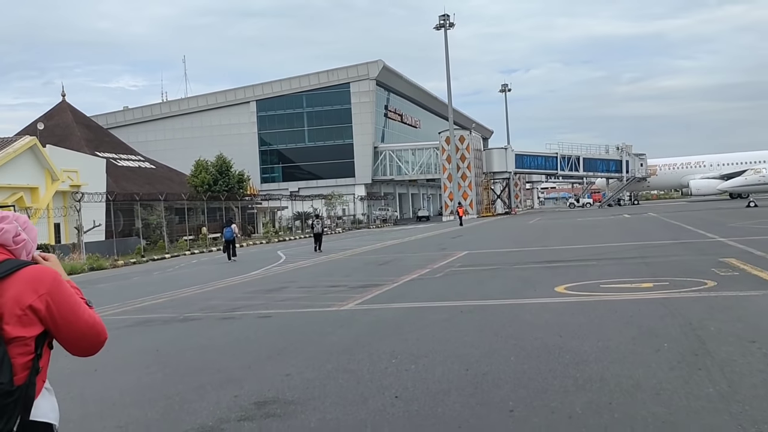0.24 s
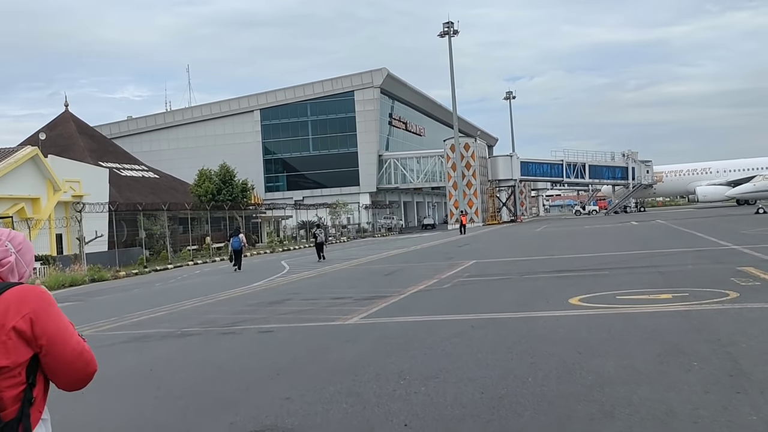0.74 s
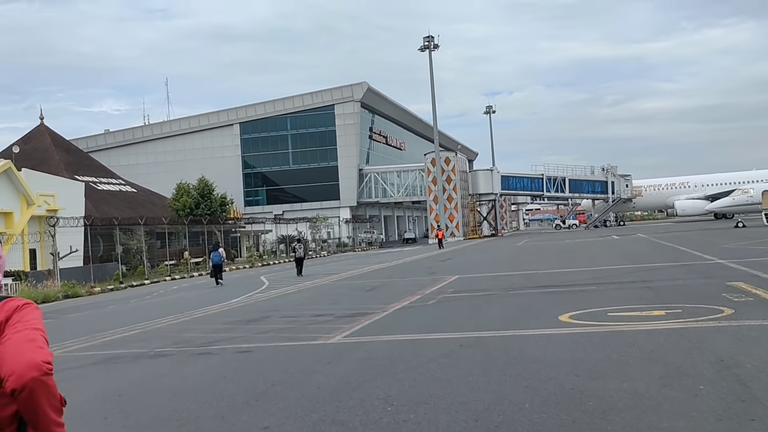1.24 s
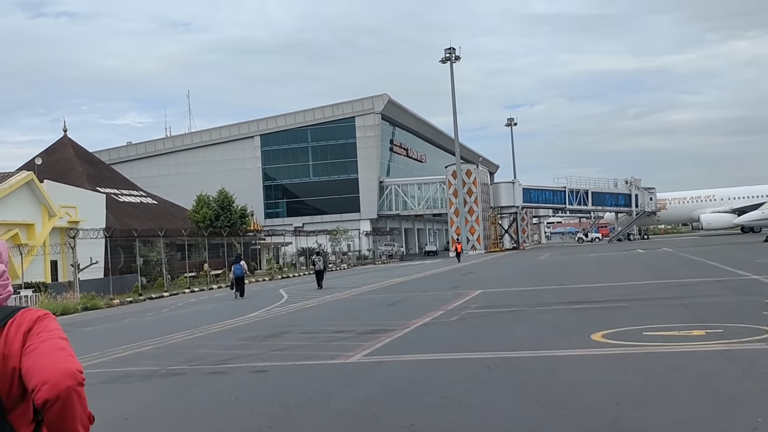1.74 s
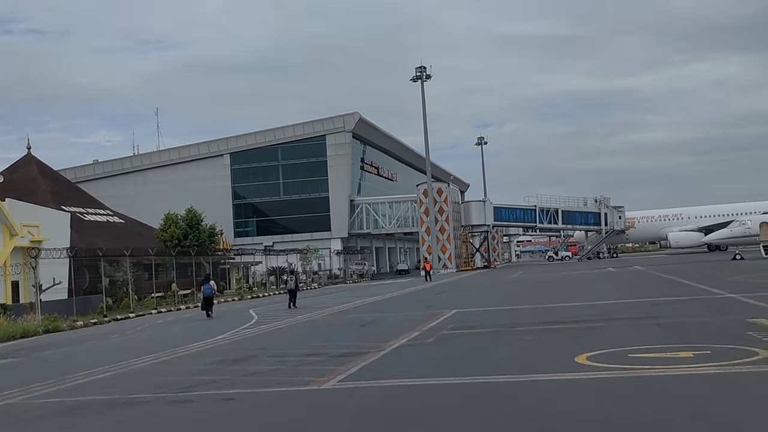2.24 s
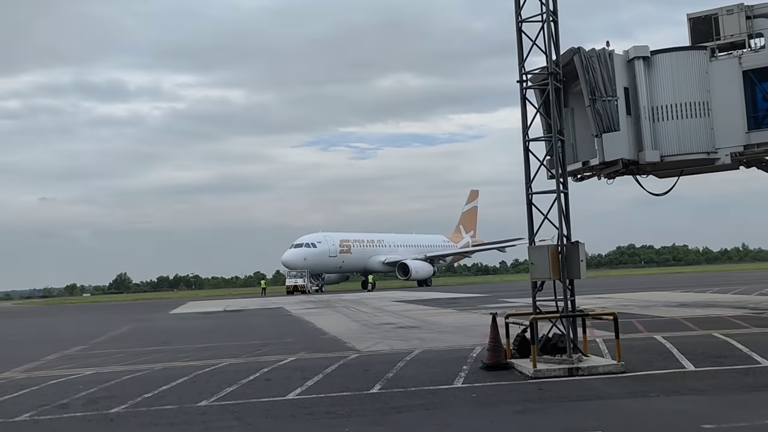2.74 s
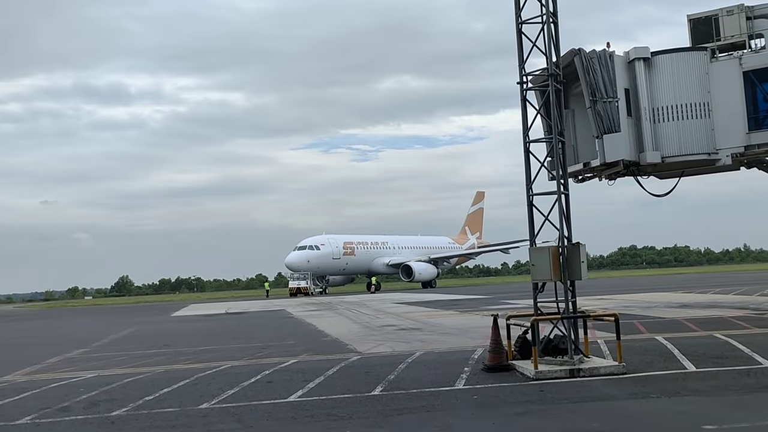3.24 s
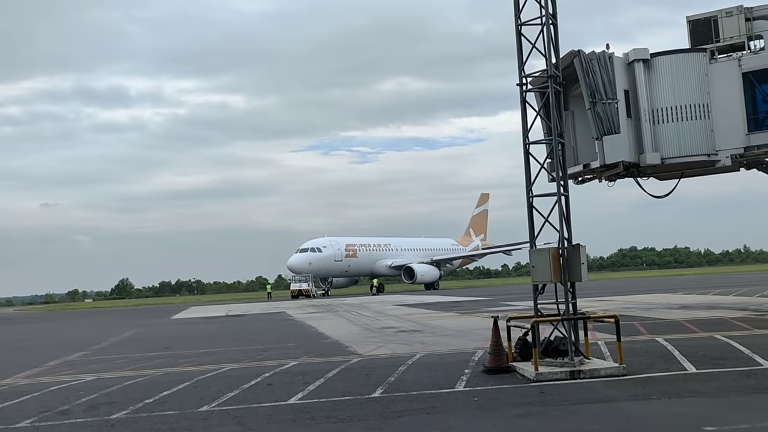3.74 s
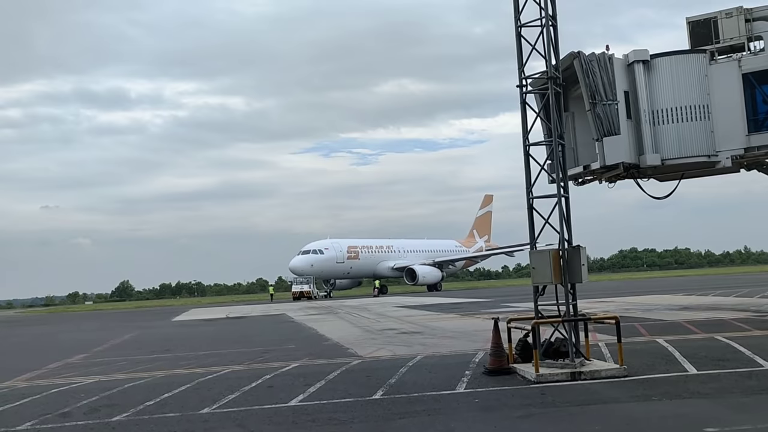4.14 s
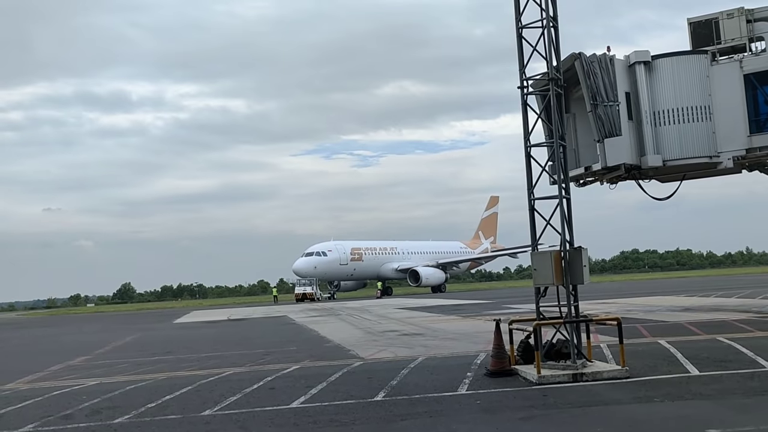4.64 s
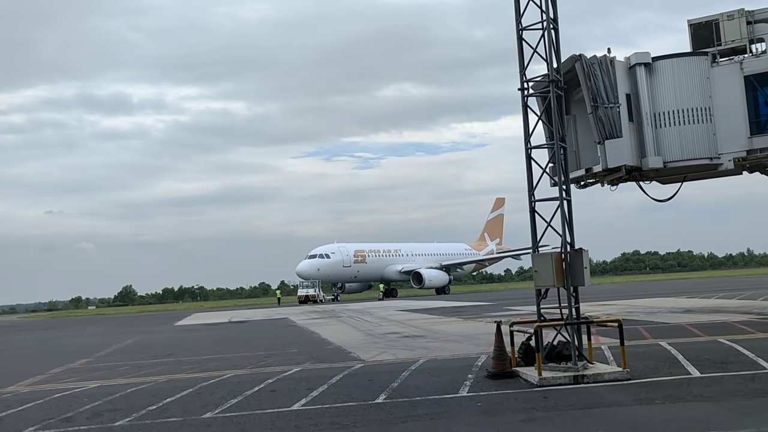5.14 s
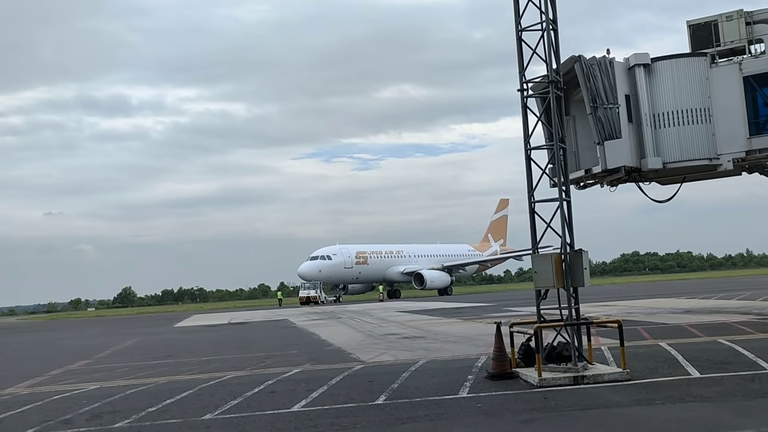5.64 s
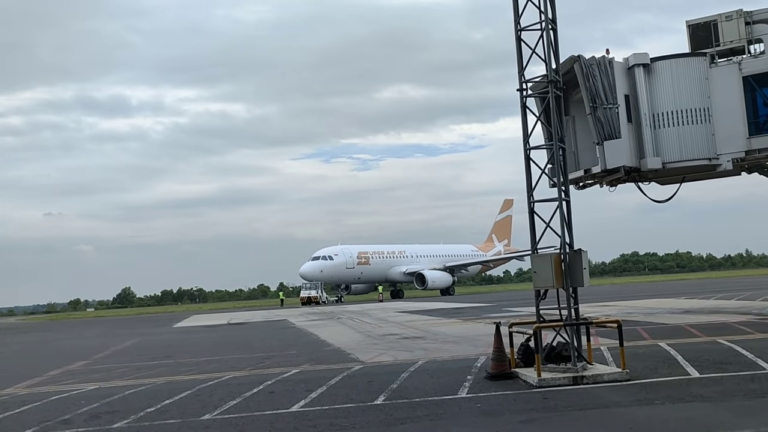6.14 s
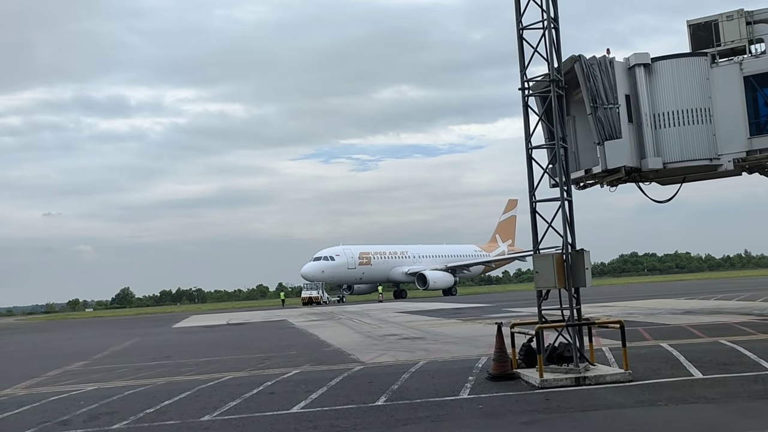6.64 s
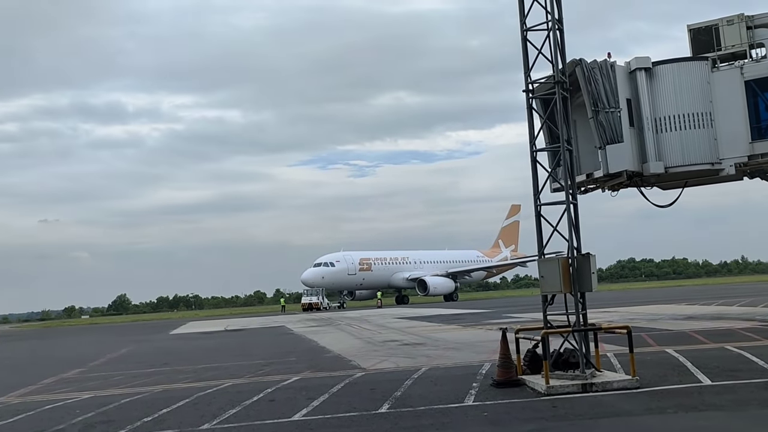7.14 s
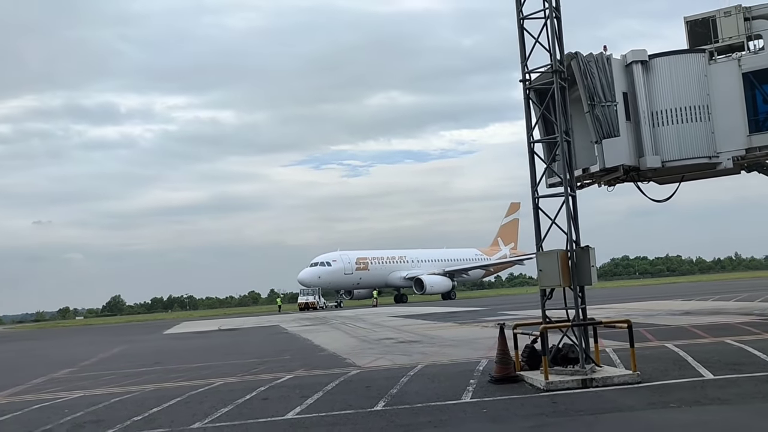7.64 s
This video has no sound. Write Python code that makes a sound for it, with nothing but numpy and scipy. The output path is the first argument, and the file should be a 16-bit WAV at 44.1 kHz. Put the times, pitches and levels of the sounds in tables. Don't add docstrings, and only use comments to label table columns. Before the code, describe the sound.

On an open airport apron, idling jet engines give a steady low roar, airy rush and fine hiss with a faint wavering whine. Wind flutters and pops against the stereo microphone. Around 2.5 seconds everything fades to silence, then returns from a sheltered spot: less wind, stronger fluctuating turbine whine, a low hum, and another engine slowly rising in pitch.

```python
import sys
import numpy as np
from scipy import signal
from scipy.fft import rfft, irfft
from scipy.io import wavfile
from scipy.ndimage import uniform_filter1d

SR = 44100
rng = np.random.default_rng(int(sys.argv[2]) if len(sys.argv) > 2 else 0)


def natural_amplitude(level_db):
    exponent = np.asarray(level_db, float) / 20
    return 10 ** exponent


def wrap_up_sound(samples):
    columns = np.atleast_2d(samples).T
    tamed = np.clip(columns, -1, 1)
    steps = np.round(tamed * 32767).astype(np.int16)
    wavfile.write(sys.argv[1], SR, steps)


N = 348390
T = np.arange(N) / SR
CUT_S = 2.4955
# f/Hz, density/dB
THUMP_SPECTRUM = [(10, -19), (22, 0), (35, 1), (55, -4), (90, -6), (200, -62)]


def evened(x):
    return x / np.sqrt(np.mean(abs(x) ** 2) + 1e-20)


def read(points, hz):
    f, value = np.transpose(points)
    return np.interp(np.log(hz + 1), np.log(f + 1), value)


def column(rows, index, t):
    rows = np.array(rows)
    return np.interp(t, rows[:, 0], rows[:, index])


def smoothed(x, first_size, second_size):
    return uniform_filter1d(uniform_filter1d(x, size=first_size, axis=-2), size=second_size, axis=-1)


def drift(width_hz, count, size):
    step = 64
    z = rng.standard_normal((count, size // step + 2, 2)) @ [1, 1j]
    hz = np.fft.fftfreq(z.shape[1], step / SR)
    z = np.fft.ifft(np.fft.fft(z) / (1 + (2 * hz / width_hz) ** 2))
    at = np.arange(size) / step
    return [evened(np.interp(at, np.arange(len(v)), v)) for v in z]


def swells(t, rows, rest_db):
    return natural_amplitude(rest_db) + sum(natural_amplitude(db) * np.exp(-((t - at) / half) ** 2) for at, db, half in rows)


def coloured(spectrum, size):
    gain = natural_amplitude(read(spectrum, np.fft.rfftfreq(size, 1 / SR)))
    return evened(irfft(rfft(rng.standard_normal((2, size))) * gain, size))


def two_paths(db, phase_turns, front, across):
    carrier = np.exp(2j * np.pi * phase_turns)
    return np.sqrt(2) * natural_amplitude(db) * (carrier * [front - across, front + across]).real


def carried_tone(t, turns, rows, rest_db, ports_db, scatter):
    paths = 1 + scatter * np.array(drift(2.5, 2, len(t)))
    level = np.sqrt(2 / (1 + scatter ** 2)) * natural_amplitude(ports_db)[:, None] * swells(t, rows, rest_db)
    return level * (paths * np.exp(2j * np.pi * turns)).real


def airflow(t, spot, spectrum, layer, size, patchy_db, flicker_db, trim_db):
    # f/Hz, correlation
    likeness = [
        [(60, 1), (400, 0.95), (900, 0.78), (1100, 0.52), (1300, 0.032), (1600, 0.68), (2500, 0), (15000, 0.37)],
        [(60, 1), (270, 0.98), (450, 0.78), (550, 0.62), (750, 0.85), (1000, 0.012), (1300, 0), (15000, 0.098)],
    ]
    # f/Hz, difference/dB
    lean = [
        [(60, -6), (110, -9), (200, 1), (380, 0), (700, 1.0), (1290, -0.5), (2380, -1), (4400, 0.5), (8120, 7.5), (15000, 10)],
        [(60, 0.5), (110, -1), (200, 1.5), (380, 1), (700, -2.5), (1290, -1.5), (2380, -6.5), (4400, -3), (8120, 1.5), (15000, 18)],
    ]
    left_engine = [
        (.35, 14),
        (.3, 12),
    ]
    # roar/dB, rush/dB, sizzle/dB
    steady_db = [
        (-25.5, -29.5, -45),
        (-28, -26, -41.5),
    ]
    # t/s, sizzle gain/dB
    facing = [(0, 1), (.9, 2.5), (1.6, 5.5), (2.0, 5), (2.49, 3.5), (2.6, 2.5), (3.1, 3), (3.6, -0.5),
              (4.4, -0.5), (5.2, 2), (6.5, 1.7), (7.4, 3.5), (7.9, 1.3)]
    # roar, rush, sizzle [dB/dB]
    follow = [
        (0.21, -0.46, 1),
        (0.13, 0.27, 0.98),
    ]

    overlap = size * 3 // 4
    hz, s, z = signal.stft(rng.standard_normal((2, len(t))), SR, nperseg=size, noverlap=overlap)
    patches = evened(smoothed(rng.standard_normal(z.shape), 8, 20))
    flicker = evened(uniform_filter1d(rng.standard_normal(len(s)), size=12))

    share, lag = left_engine[spot]
    aside = share * np.exp(-2j * np.pi * hz * lag / SR)
    aside = aside / (1 + (1200 / (hz + 1)) ** 4 + (hz / 9000) ** 4)
    same = (np.clip(read(likeness[spot], hz), 0, .99) + aside)[:, None]
    other = np.sqrt(np.maximum(1 - abs(same) ** 2, 0))
    pair = np.array([z[0], same * z[0] + other * z[1]]) / np.sqrt((1 + same.real) / 2)

    lively = 1 / (1 + (hz[:, None] / 10500) ** 8)
    lean_db = read(lean[spot], hz)[:, None] / 2
    effort_db = steady_db[spot][layer] + follow[spot][layer] * column(facing, 1, s + t[0])
    swell_db = effort_db - effort_db.mean() + flicker_db * flicker + patchy_db * patches
    level_db = trim_db + effort_db.mean() + lively * swell_db
    tint = evened(natural_amplitude(read(spectrum[spot], hz)))[:, None]
    pair *= tint * natural_amplitude(level_db + np.array([lean_db, -lean_db]))
    return signal.istft(pair, SR, nperseg=size, noverlap=overlap)[1][:, :len(t)]


def whine(t, spot, wander_hz, fading_hz):
    # level/dB, sideways share/dB, lean to the right (-1..1)
    stack = [
        [(0, -12, 0), (0, -8, -.2), (0, -8, .1), (-2, -5, .1), (-2, 0, .3), (-3, 0, .1), (-65, 0, .1)],
        [(0, -9, 0), (0, -3, -.15), (-1.5, 1, .4), (0, -3, .5), (0, -3, .5), (-2, -3, .2), (-58, 0, .2)],
    ]
    # t/s, peak/dB, half length/s
    first = [(0.3, -36, 0.41), (0.84, -41, 0.17), (2.55, -38.5, 0.6), (3.18, -35, 0.12), (3.55, -31.5, 0.1),
             (3.9, -34.5, 0.12), (4.42, -34.5, 0.34), (4.95, -37, 0.08), (5.21, -33.5, 0.12),
             (5.51, -31.5, 0.1), (5.75, -35, 0.11), (6.05, -33, 0.13), (6.37, -28.5, 0.13),
             (6.74, -33.5, 0.18), (7.21, -30.5, 0.21), (7.63, -31, 0.15)]
    second = [(.46, -38.5, 0.33), (.73, -40.5, 0.12), (1.41, -42, 0.089), (1.64, -36, 0.54),
              (2.77, -35.5, 0.038), (2.95, -34.5, 0.42), (3.85, -31.5, 0.43), (4.45, -32.5, 0.18),
              (4.95, -33, 0.19), (5.27, -32, 0.056), (5.62, -34, 0.3), (6.38, -32, 0.23),
              (6.98, -39.5, 0.23), (7.42, -35.5, 0.11), (7.62, -37, 0.093), (7.85, -32, .12)]
    third = [(.2, -48, .07), (.57, -46, 0.073), (2.26, -50, 0.057), (1.02, -41, 0.18), (1.76, -46, 0.28),
             (2.9, -43, 0.23), (3.5, -45.5, 0.33), (4.95, -44, 0.57), (6.34, -43, 0.55), (7.1, -56, .2),
             (7.7, -43.5, 0.5)]
    fourth = [(.14, -48, 0.1), (.52, -48, 0.088), (.84, -44, 0.09), (1.3, -42, 0.062), (1.62, -44, .07),
              (2.05, -58, .15), (3.05, -40, .12), (3.35, -39.5, 0.16), (3.57, -30, 0.12), (4.04, -37, 0.18),
              (4.42, -38.5, 0.054), (4.8, -38.5, 0.22), (5.49, -37.5, 0.26), (5.83, -35, .13),
              (6.33, -37.5, 0.24), (6.78, -38.5, .1), (7.15, -35.5, 0.24), (7.63, -36, 0.28)]
    fifth = [(2.8, -43, 0.092), (3.55, -45, .15), (3.95, -44, .16), (4.2, -42.5, 0.06), (4.57, -44, .1),
             (4.95, -42, .12), (5.27, -46, 0.092), (5.8, -46, .14), (6.2, -45, .1), (6.5, -45, .12),
             (6.87, -42, 0.065), (7.27, -44, .1), (7.85, -44, .12)]
    sixth = [(3.0, -46.5, 0.13), (3.42, -46, .08), (3.7, -46, .1), (4.2, -43.5, 0.13), (4.42, -46, .07),
             (4.67, -45, .08), (4.95, -43, .06), (5.4, -42, .09), (5.85, -48, .1), (6.42, -53, .12),
             (6.8, -48, .1), (7.3, -49, .1)]
    swelling = first, second, third, fourth, fifth, sixth
    shaft_hz = (645.6, 643.0)[spot]
    faint_db, per_overtone_db = (-53.5, -50)[spot], -0.5

    turns = np.cumsum(shaft_hz + wander_hz * drift(0.61, 1, len(t))[0].real) / SR
    out = np.zeros((2, len(t)))
    for k, (db, side_db, lean) in enumerate(stack[spot], 1):
        front, side = drift(fading_hz * k ** 0.53, 2, len(t))
        if k <= len(swelling):
            swell = swells(t, swelling[k - 1], faint_db + per_overtone_db * k)
            flutter = 1 + 0.13 * drift(14.0, 1, len(t))[0]
            front = swell * np.exp(.4j * front.real) * flutter
            side = side * np.sqrt(np.mean(abs(front) ** 2))
        else:
            front = .75 + .6 * front
        across = lean * front + natural_amplitude(side_db) * side
        out += two_paths(db, k * turns, front, across)
    return out


def blades(t, spot):
    # f/Hz, width/Hz, level/dB
    tones = [
        [(3647, 14, -62), (5125, 12, -63), (6944, 10, -72), (7687, 14, -78), (8714, 14, -80), (9064, 16, -78)],
        [(133, 9, -48), (165, 12, -43), (197, 10, -40), (236, 9, -39), (264, 8, -41), (425, 14, -45), (3848, 25, -52), (6916, 30, -66), (9021, 14, -65)],
    ]
    # f/Hz, width/Hz, level/dB
    twin = [
        (1280.4, 2.5, -48),
        (1920.6, 4, -52),
        (2560.8, 4, -50),
    ]
    out = np.zeros((2, len(t)))
    for hz, width_hz, db in tones[spot] + twin * spot:
        front, side = drift(width_hz, 2, len(t))
        out += two_paths(db, hz * t, front, side * hz / (hz + 1500))
    return out


def standpoint(t, spot):
    # f/Hz, density/dB
    roar_spectrum = [
        [(12, -44), (20, -21), (32, -14), (53, -6.5), (123, -17), (166, -3.5), (197, -0.5), (226, -0.5), (273, -2.5), (304, -12), (348, -6), (398, -9.5), (500, -20.5), (650, -53), (1100, -120)],
        [(12, -66), (20, -38), (32, -19), (60, -10.5), (76, -14), (97, -19), (118, -10), (187, 0), (248, -0.5), (300, -5.5), (420, -6.5), (455, -17), (500, -8), (650, -32.5), (1100, -120)],
    ]
    rush_spectrum = [
        [(250, -58), (420, -8), (515, -9), (651, -7), (685, -4), (1020, -4.5), (1140, -11.5), (1330, -12.5), (1370, -11), (1520, -19), (2000, -11.5), (2280, -13.5), (4800, -23.5), (6240, -43), (10600, -120)],
        [(250, -44), (420, -9.5), (600, -5.5), (644, -2.5), (685, -6), (1020, -8), (1250, -9), (1470, -14.5), (2380, -11.5), (2580, -11), (2830, -13.5), (3720, -12.5), (4800, -23.5), (6240, -29.5), (10600, -120)],
    ]
    sizzle_spectrum = [
        [(2530, -6), (4300, 0), (4890, -5.5), (5270, -0.5), (6120, -10.5), (6820, -11), (7310, -17.5), (7800, -17), (8270, -32), (9060, -17.5), (9820, -30), (10600, -30), (11900, -41), (13800, -35), (15500, -46)],
        [(2530, -29), (4300, -7), (6160, -9), (6600, -12), (7120, -14), (7270, -16.5), (8140, -21), (8770, -18.5), (9200, -15.5), (9350, -18), (10000, -26), (11400, -34), (12000, -48), (13900, -48.5), (15500, -66)],
    ]
    roar = airflow(t, spot, roar_spectrum, layer=0, size=4096,
                   patchy_db=1.4, flicker_db=1.43, trim_db=[-3.5, -1.6][spot])
    rush = airflow(t, spot, rush_spectrum, layer=1, size=512,
                   patchy_db=0.84, flicker_db=0.26, trim_db=[-1.8, -1.7][spot])
    sizzle = airflow(t, spot, sizzle_spectrum, layer=2, size=512,
                     patchy_db=-0.4, flicker_db=-0.83, trim_db=[-.2, -.3][spot])
    tones = whine(t, spot, wander_hz=0.394, fading_hz=3.3) + blades(t, spot)
    return roar + rush + sizzle + tones


def hum(waver_hz, waver_db):
    # t/s, f/Hz, level/dB
    course = [(0, 63, -40), (1.6, 63, -39), (2.4, 63.13, -39.5), (2.6, 65.9, -40), (3.0, 65.94, -42),
              (3.2, 66.04, -45), (7.9, 66, -47)]
    pitch, swell = np.real(drift(5.2, 2, N))
    turns = np.cumsum(column(course, 1, T) + waver_hz * pitch) / SR
    level = natural_amplitude(column(course, 2, T) + waver_db * swell)
    return np.sqrt(2) * level * np.cos(2 * np.pi * turns)


def wind(t, lumpy_db, thump_db, flutter_db):
    # t/s, half length/s, thump/dB, flutter/dB
    gusts = [
        [(.38, .08, -39, -33), (.78, 0.079, -42, -35), (.98, .04, -36, -31), (1.1, .05, -28, -27), (1.24, 0.064, -31, -32), (1.68, 0.072, -37, -24), (1.79, 0.078, -25, -40), (1.9, 0.097, -33, -28)],
        [(.2, .15, -43, -26.5), (.65, 0.1, -28, -21), (.9, 0.19, -45, -25), (1.35, 0.078, -39, -27), (1.55, .07, -29, -37), (1.74, 0.066, -32, -27), (1.85, 0.045, -32, -41), (2.15, 0.066, -41, -27)],
    ]
    # t/s, port, peak/dB, f/Hz, spread/s
    pops = [(.645, 1, -19, 45, .025), (.98, 0, -27, 30, .02), (1.11, 0, -22, 40, .02),
            (1.79, 0, -22, 28, .03), (1.365, 1, -13, 170, 0.004), (1.378, 0, -14, 33, 0.022),
            (1.617, 0, -14, 171, 0.0072), (1.617, 1, -21, 190, 0.0055), (1.693, 0, -11, 236, 0.0076),
            (1.75, 0, -17, 284, 0.0055), (1.777, 1, -14, 130, 0.0074), (1.867, 0, -3, 208, 0.0032),
            (1.872, 0, -11, 38, 0.01), (1.987, 0, -9.5, 169, 0.0026)]
    # f/Hz, density/dB
    flutter_spectrum = [(50, -12), (100, 1), (170, 2.5), (250, -5.5), (350, -9.5), (500, -20), (1000, -66)]
    breeze_thump_db, breeze_flutter_db = -50, -38.5

    thump = np.array([swells(t, [(s, db, half) for s, half, db, _ in port], breeze_thump_db)
                      for port in gusts])
    flutter = np.array([swells(t, [(s, db, half) for s, half, _, db in port], breeze_flutter_db)
                        for port in gusts])
    lumps = natural_amplitude(lumpy_db * np.real(drift(25., 2, len(t))))
    out = natural_amplitude(thump_db) * thump * coloured(THUMP_SPECTRUM, len(t))
    out += natural_amplitude(flutter_db) * flutter * lumps * coloured(flutter_spectrum, len(t))
    for at, port, db, pop_hz, spread_s in pops:
        u = t - at
        skewed_s = spread_s * (0.86 + 0.27 * np.tanh(u / .002))
        envelope = np.exp((.001 - np.hypot(u, .001)) / skewed_s)
        out[round(port)] += natural_amplitude(db) * np.cos(2 * np.pi * pop_hz * u) * envelope
    return out


def slower_engine(t):
    # t/s, peak/dB, half length/s
    carry = [(.14, -42, .13), (.78, -48.5, .06), (.97, -49, 0.13), (1.45, -45, 0.072), (2.2, -48, 0.26)]
    return carried_tone(t, 2561 * t, carry, -60.5, np.zeros(2), scatter=0.45)


def spooling(t):
    # t/s, shaft speed/Hz
    speed = [(2.5, 112.27), (2.9, 112.55), (3.5, 112.95), (4.7, 113.27), (5.7, 113.68), (6.1, 114.32),
             (6.6, 115.14), (7, 116.05), (7.4, 116.73), (7.9, 117.45)]
    # t/s, peak/dB, half length/s
    order_swells = [
        [(3.5, -48, .25), (5.0, -52, 0.2), (7.5, -43, .1)],
        [(3.05, -42, .15), (3.55, -41, 0.33), (4.1, -48, .15), (4.8, -46, .22), (5.7, -44, 0.13), (6.15, -42.5, .16), (6.6, -41, 0.14), (6.9, -39, .15), (7.5, -39, .3)],
        [(3.9, -42, .15), (4.82, -38, .25), (6.28, -40, .1), (6.65, -37.5, 0.17), (7.0, -37.5, .1), (7.28, -35, 0.081), (7.7, -40, .25)],
        [(3.0, -51, 0.18), (4.8, -54, 0.086), (5.15, -50, 0.18), (6.2, -58, .3)],
        [(3.5, -41, .2), (3.95, -47, 0.14)],
        [(3.3, -59, .15), (3.8, -61, .1), (5.25, -57, .35), (5.85, -61, .1), (6.7, -61, .2)],
        [(3.8, -64, .2), (6.3, -63, .2), (7.0, -61, .2)],
    ]
    # t/s, peak/dB, half length/s
    pure_swells = [
        [(3.08, -43, .08), (3.6, -49, .2), (4.2, -48, .15), (5.1, -47, .15), (5.65, -51, .1), (6.9, -54, .2)],
        [(2.75, -45, 0.11), (3.3, -45, 0.14), (4.2, -47, 0.27), (5.05, -47, 0.27), (5.65, -47, 0.2), (6.1, -53, .15), (7.7, -51, .15)],
        [(4.0, -53, .15), (5.6, -51, .15), (6.7, -46, 0.23), (7.35, -45, .06)],
        [(3.3, -64, 0.33), (4.3, -66, 0.48), (5.7, -66, 0.58), (7.3, -65, .4)],
    ]
    orders, orders_faint_db = (21, 22, 23, 42.57, 11, 53.8, 54.8), (-55, -55, -55, -60, -56, -68, -70)
    pure_hz, pure_faint_db = (3603, 3638, 3888, 6916), (-56, -55, -56, -65)
    ports_db = np.array((-5, 2))

    turns = np.cumsum(column(speed, 1, t) + 0.0509 * drift(1.48, 1, len(t))[0].real) / SR
    rising = sum(carried_tone(t, k * turns, rows, db, ports_db, scatter=0.53)
                 for k, rows, db in zip(orders, order_swells, orders_faint_db))
    steady = sum(carried_tone(t, hz * t, rows, db, ports_db / 2, scatter=0.49)
                 for hz, rows, db in zip(pure_hz, pure_swells, pure_faint_db))
    return rising + steady


def late_gust(t):
    # t/s, thump/dB
    course = [
        (2.5, -50),
        (2.9, -39),
        (3.05, -53),
        (3.25, -62),
    ]
    return natural_amplitude(column(course, 1, t)) * coloured(THUMP_SPECTRUM, len(t))[0]


def scene():
    first, second = T[T < CUT_S], T[T >= CUT_S]
    windy = standpoint(first, 0) + wind(first, lumpy_db=0.5, thump_db=-4.5, flutter_db=-5.5)
    windy += slower_engine(first)
    sheltered = standpoint(second, 1) + spooling(second) + late_gust(second)
    return np.concatenate([windy, sheltered], axis=1) + hum(waver_hz=1.07, waver_db=1.0)


def gate(x, start_s, limits, budget_db, band_db):
    # t/s, strength/dB, half length/s
    spare = [(3.08, 5, .025), (3.19, 0, .04), (3.3, 5, .03), (3.624, 0.5, 0.11), (4.272, 0, .04),
             (4.48, 1, .03), (4.584, 5, .03), (4.83, 5, .03), (4.93, 0, .03), (5.18, 3, .09),
             (5.36, 2, .06), (5.823, 8, 0.022), (6.55, 4, .03), (6.63, 3, .02), (6.97, 2, .03),
             (7.142, 3.5, 0.096), (7.33, 4, 0.044), (7.68, 1, .03)]
    size = x.shape[1]
    x = np.pad(x, ((0, 0), (0, 2048)), "reflect")
    hz, s, z = signal.stft([x[0] + x[1], x[0] - x[1]], SR, nperseg=2048, noverlap=1536,
                           boundary="even", padded=False)
    power = abs(z) ** 2 + 1e-20
    patch = smoothed(power, 3, 3)
    usual = smoothed(power, 30, 40)
    chance = rng.standard_normal((2, len(s)))
    budget = evened(uniform_filter1d(chance[0], size=2)) * .6 + swells(s + start_s, spare, -29)
    bands = evened(smoothed(rng.standard_normal(z.shape[1:]), 12, 4))
    top = np.exp(-((hz[:, None] - 11000) / 1700) ** 4)
    limit_db = read(limits, hz)[:, None] + band_db * bands * (1 - 0.45 * top)
    limit_db = limit_db - budget_db * budget * top
    kept = (10 * np.log10(abs(patch / usual)) > limit_db) | (hz[:, None] < limits[0][0])
    both, apart = signal.istft(z * kept, SR, nperseg=2048, noverlap=1536)[1][:, :size] / 2
    return np.array([both + apart, both - apart])


def roll_off(x):
    return signal.sosfilt(signal.butter(12, 15630, fs=SR, output="sos"), x)


def record(dry):
    # f/Hz, limit re usual level/dB
    limits = [
        [(2200, -10), (3200, -5), (4000, -3.5), (4400, -1), (5000, -2), (7000, .5), (9000, -4), (10000, 1), (11000, -.5), (12000, 1), (13000, .5), (14300, .5), (14900, 6), (15400, 10)],
        [(3000, -11), (4500, -4), (6000, -1), (6650, 1), (6900, -1), (7300, 3.5), (7700, 1), (8400, 2), (9000, -5), (9700, 9), (12300, 9), (13000, 0), (14300, 0), (15000, 8)],
    ]
    silent_s, fade_s = 0.0075, 0.49
    fade = np.clip((abs(T - CUT_S) - silent_s) / fade_s, .001, 1)
    fade *= np.sin(np.pi / 2 * np.minimum((T[-1] - T) / .004, 1)) ** 2
    windy = gate(dry[:, T < CUT_S], 0, limits[0], budget_db=3.5, band_db=2.5)
    sheltered = gate(dry[:, T >= CUT_S], CUT_S, limits[1], budget_db=4.5, band_db=2.5)
    return roll_off(np.concatenate([windy, sheltered], axis=1) * fade)


dry = scene()
out = record(dry)
wrap_up_sound(out)
```